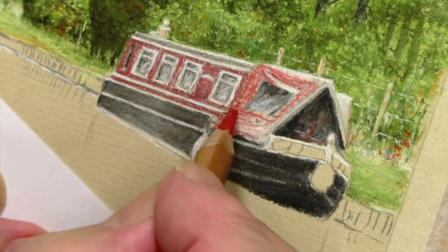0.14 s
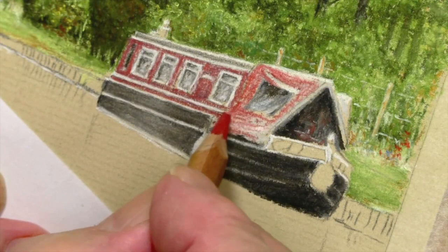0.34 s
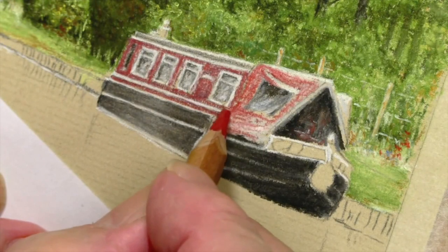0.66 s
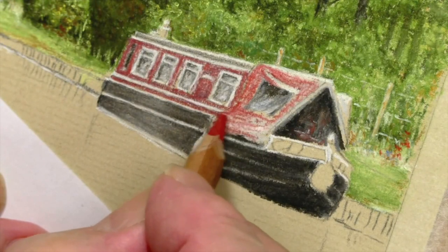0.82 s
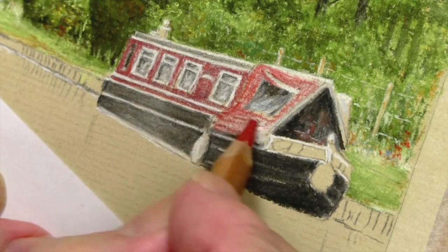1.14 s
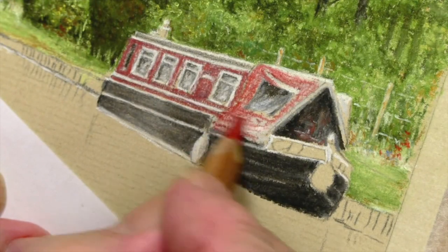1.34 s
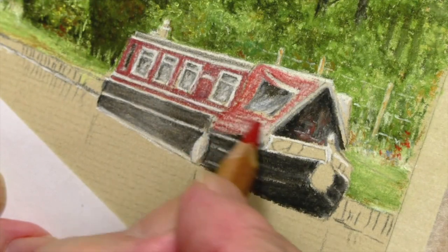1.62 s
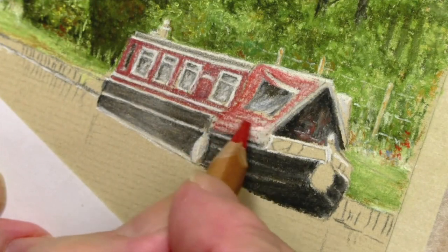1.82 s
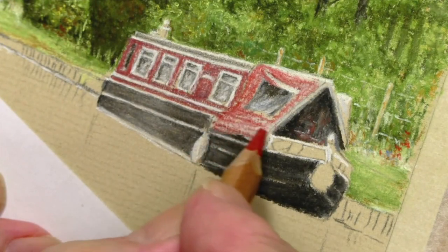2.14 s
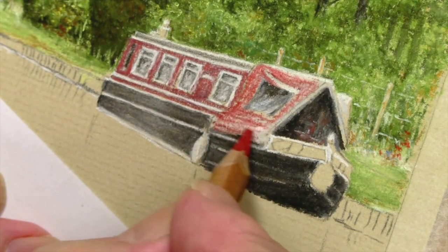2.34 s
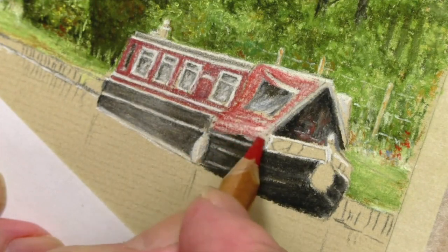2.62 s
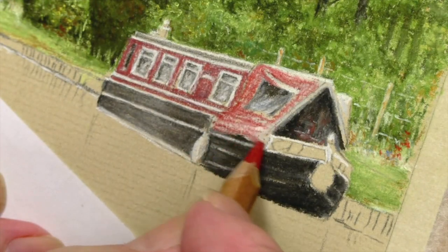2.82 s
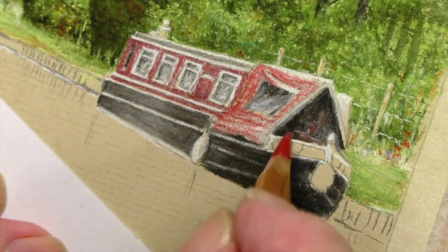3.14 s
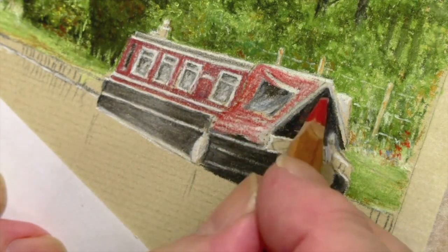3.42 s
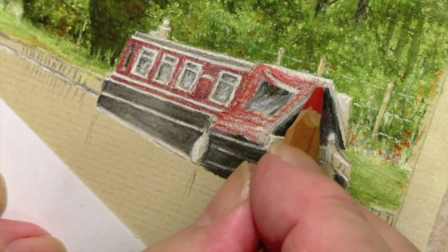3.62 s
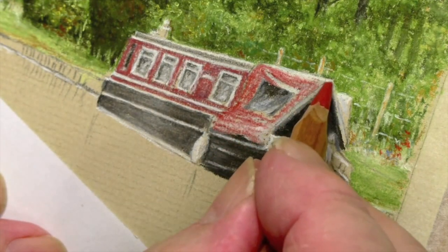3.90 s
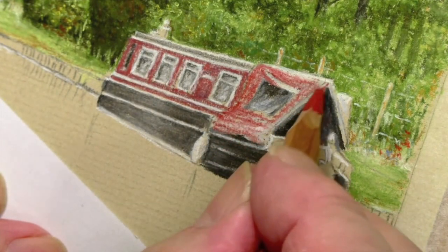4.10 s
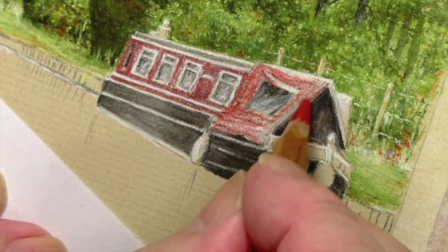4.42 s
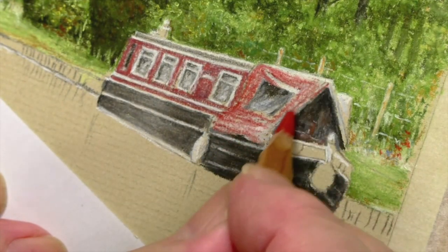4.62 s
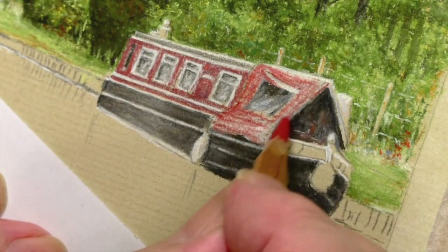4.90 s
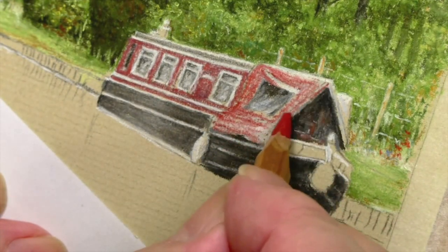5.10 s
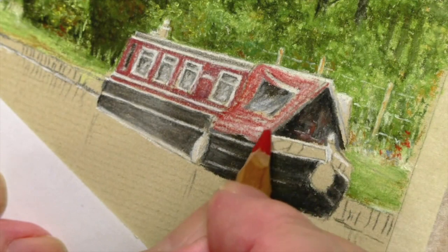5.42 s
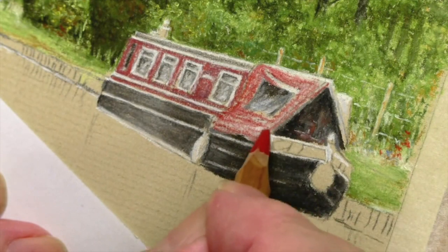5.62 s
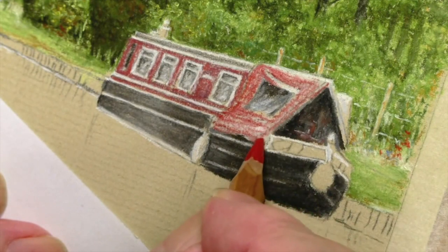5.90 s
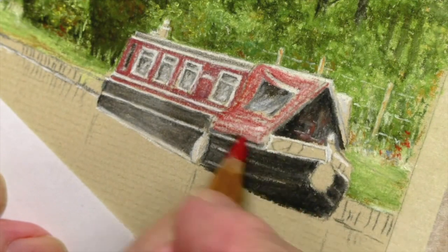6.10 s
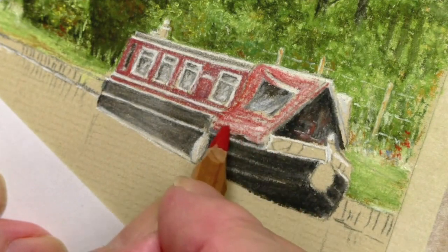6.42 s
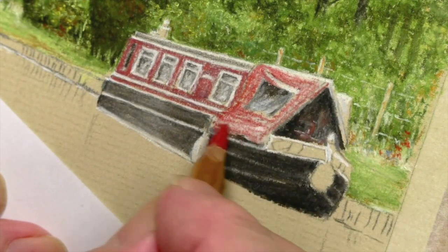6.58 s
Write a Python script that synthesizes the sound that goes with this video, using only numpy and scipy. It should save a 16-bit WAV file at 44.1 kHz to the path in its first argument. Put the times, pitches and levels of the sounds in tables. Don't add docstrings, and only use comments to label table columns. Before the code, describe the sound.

A coloured pencil scratches quick, dry shading strokes over toothed paper on a board, close up, above a faint low hum in a quiet room.

```python
import sys
import numpy as np
from scipy import signal
from scipy.fft import rfft, irfft, next_fast_len
from scipy.io import wavfile
from scipy.ndimage import uniform_filter1d, map_coordinates

SR = 44100
rng = np.random.default_rng(int(sys.argv[2]) if len(sys.argv) > 2 else 0)


def store_pcm(level_fs):
    pcm = np.round(np.clip(level_fs, -1, 1) * 32767).astype(np.int16)
    wavfile.write(sys.argv[1], SR, np.atleast_2d(pcm).T)


def linear_from_db(decibels):
    return 10 ** (np.asarray(decibels, float) / 20)


N = 297763

# start in seconds, speeding up in seconds, slowing down in seconds, top speed in dB, pressure in dB.
PENCIL_STROKES = [(0.027, 0.06, 0.072, -42, -44.5), (0.333, .026, 0.077, -49, -43.5),
                  (0.497, .026, .01, -69, -50), (0.552, 0.032, .14, -52.5, -46),
                  (0.702, .039, .055, -61, -50.5), (0.808, 0.035, 0.045, -50, -46),
                  (0.867, 0.056, 0.022, -57, -46), (0.966, 0.095, 0.034, -51, -45.5),
                  (1.123, 0.051, 0.077, -43, -44), (1.385, 0.067, 0.072, -41, -42.5),
                  (1.654, 0.057, 0.086, -43.5, -45), (1.86, .14, 0.061, -47, -48),
                  (2.049, .008, 0.029, -54, -50.5), (2.161, .031, 0.094, -48, -45.5),
                  (2.372, 0.065, 0.082, -47, -47), (2.631, 0.04, 0.086, -50, -48.5),
                  (2.822, .087, 0.053, -49, -45), (2.98, .12, .2, -51, -56), (3.13, .16, 0.054, -51, -56.5),
                  (3.28, 0.063, 0.3, -58, -66),
                  (3.822, 0.011, .04, -58, -56), (3.83, .1, 0.14, -62.5, -59),
                (3.986, 0.068, .066, -44.5, -47.5), (4.34, 0.053, 0.087, -42, -47),
                (4.571, 0.13, .07, -45, -44.5), (4.865, 0.14, 0.061, -46.5, -43),
                (5.159, 0.0078, .046, -60.5, -52), (5.185, 0.064, 0.12, -47, -45.5),
                (5.422, 0.039, 0.11, -49.5, -43), (5.46, .096, 0.063, -50, -48),
                (5.683, .012, 0.12, -57.5, -49.5), (5.701, 0.11, 0.06, -53, -47),
                (5.915, 0.015, .05, -56, -48), (6.008, 0.17, .124, -53.5, -60),
                (6.28, .019, .062, -56, -51), (6.451, .089, .01, -65, -51.5),
                (6.526, 0.046, 0.061, -50.5, -49), (6.638, 0.076, .023, -67.5, -59)]
# frequency in Hz, level in dB per Hz.
TIP_HISS = [(2000, -35), (3300, -13), (4200, -13), (5500, -10), (6750, -1), (7900, -3.5), (9500, 0.5),
            (11500, 2.5), (12500, 0), (15400, -2), (15750, -70)]
# frequency in Hz, level in dB per Hz.
PAPER_BODY = [(150, 11), (280, -4.5), (400, -2), (900, 1.5), (2000, -4), (2800, -4), (3300, -18.5),
              (4500, -47), (7000, -60)]
# frequency in Hz, width in Hz, level in dB.
BOARD_MODES = [(399, 58, -1.5), (550, 43, -5), (650, 53, -3.5), (824, 45.5, 3), (1070, 24, 1),
               (1202, 54, -1), (1610, 85, 4), (2096, 190, -0.5), (2580, 340, -10.5)]
# time in seconds, peak in dB.
TIP_KNOCKS = [(0.341, -44), (0.562, -40), (0.816, -44), (0.982, -46), (1.137, -41.5), (2.39, -39),
              (3.827, -38.5), (4.354, -41), (4.8853, -35), (5.163, -40.5), (5.4199, -29), (5.685, -31.5),
              (5.923, -40), (6.29, -49)]
# start in seconds, length in seconds, level in dB.
HAND_SLIDES = [
    (2.953, 0.42, -57.5),
    (3.333, 0.16, -65.5),
    (3.817, 0.044, -56),
    (6.447, 0.43, -62),
]
# time in seconds, peak in dB, centre in Hz, left-right balance in dB,
# 60 dB decay in seconds, crack in dB.
FINGER_TICKS = [
    (3.6451, -15, 8000, 11, 0.004, -6),
    (3.8264, -30.5, 6670, 7, 0.0044, -2),
    (3.902, -32.5, 7470, 6, 0.0094, -10),
    (3.9546, -25.5, 7500, 2, 0.0077, -17),
]
# frequency in Hz, likeness from 0 to 1.
PENCIL_ALIKE = [(300, 0.99), (1400, 0.94), (2600, 0.9), (3500, 0.18), (5500, 0.11), (8500, 0.31),
                (15000, 0.18)]
# frequency in Hz, balance in dB.
PENCIL_PAN = [(300, 0.5), (600, 1), (900, 4.5), (1200, 0), (1800, -1.7), (2400, 4), (2800, 0), (8000, 0.4),
              (14000, 0.5)]
# frequency in Hz, phase in radians.
PENCIL_LEAD = [(300, 0), (5000, -0.66), (6200, 0.6), (9500, 1.4), (10700, 2.5), (12300, 5.5), (14500, 4)]
# frequency in Hz, level in dB per Hz.
DRAUGHT_SPECTRUM = [(1, -10), (4, 20), (8, 14), (12.5, 13.5), (17, 16), (30, -52)]
# time in seconds, strength in dB.
GUSTS = [(0.0, -29), (0.04, -42), (0.69, -35.5), (0.73, -51.5), (1.41, -29.5), (1.88, -44.5), (2.05, -34.5),
         (4.72, -41.5), (4.83, -30), (4.89, -38.5), (6.26, -30.5), (6.3, -43), (6.67, -27), (6.75, -49)]
# frequency in Hz, level in dB per Hz.
RUMBLE_SPECTRUM = [(14, -13.5), (20, 5), (33, -1), (42, -2), (60, -5.5), (100, -11.5), (130, -15),
                   (185, -23.5), (210, -23.5), (320, -31), (500, -59)]
# frequency in Hz, rms level in dB, unsteadiness in dB.
HUM_LINES = [(49.5, -52, 4), (76, -56, 4), (99.3, -54.5, 3.5), (147.5, -57, 3.5), (222, -69, 3),
             (1500, -75, 1), (1701, -74, 1)]
# time in seconds, rms level in dB.
MACHINE_LOAD = [(0.0, -75), (0.51, -49.5), (0.6, -67), (0.71, -54), (0.88, -74.5), (1.49, -51.5),
                (3.74, -63), (3.91, -49), (4.28, -77), (4.36, -53), (5.88, -77), (6.13, -53), (6.2, -79),
                (6.24, -62), (6.71, -66), (6.75, -67)]
# frequency in Hz, level in dB per Hz.
HISS_SPECTRUM = [(150, -66), (250, -8), (400, 3), (600, -4.5), (1500, -4.5), (2300, -10.5), (3200, -18.5),
                 (4300, -15), (5500, -15), (7200, -10), (9500, -13.5), (12500, -16.5), (15300, -19),
                 (15700, -64)]
# frequency in Hz, likeness from 0 to 1.
ROOM_ALIKE = [(60, 0.99), (150, 0.9), (300, 0.67), (700, 0.3), (1500, 0.34), (3000, 0), (6000, 0.02)]
# frequency in Hz, width in Hz, depth from 0 to 1.
HOUSING_NOTCHES = [(4590, 780, 0.55), (10687, 1250, 0.95)]

TIP_POWER, SHEET_POWER, BOARD_POWER = 2.06, 2.02, 0.84
SHEET_SPEED, SHEET_PRESSURE = 0.62, 0.46
SHEET_HZ, SHEEN_HZ, TOP_HZ = 1000, 10700, 15650
LANDS, BITE_S = 0.25, 0.0054
LINGER_S, LINGER_DB = 0.02, -13
THUD_HZ, THUD_WIDE_HZ = 560, 420
SLIDE_HZ, SLIDE_WIDE_HZ = 384, 160
RUMBLE_DB, RUMBLE_FOLLOWS, RUMBLE_SWAY_DB = -40.5, 0.16, 2
MACHINE_HZ = 175.5


def strokes():
    def sheet_db(speed_db, pressure_db):
        return SHEET_SPEED * (speed_db + 46.5) + SHEET_PRESSURE * (pressure_db + 47) - 45

    fast = hand(TIP_POWER, lambda speed_db, pressure_db: speed_db)
    sheet = hand(SHEET_POWER, sheet_db)
    pressed = hand(BOARD_POWER, lambda speed_db, pressure_db: pressure_db + 2.0)

    grain = wobble(45) + wobble(220)
    tip_catches = fibres(grain, spread_db=2.5, tooth_db=0.67, patchy_db=3.0)
    hiss = stereo(tip_catches, lambda hz: linear_from_db(along(TIP_HISS, hz)), PENCIL_ALIKE)
    hiss, sheen = split(hiss, SHEEN_HZ)
    brightness = (fast * linear_from_db(34)) ** 0.63
    tip = linear_from_db(3.5) * fast * (hiss + brightness * sheen)

    body_catches = fibres(grain, spread_db=4.5, tooth_db=1.0, patchy_db=2.5)
    body = lambda hz: linear_from_db(along(PAPER_BODY, hz)) * (linear_from_db(-8.5) + np.abs(board(hz)))
    low, high = split(stereo(body_catches, body, PENCIL_ALIKE), SHEET_HZ)
    return tip + pressed * low + sheet * high


def hand(power, level):
    energy = np.zeros(N + SR)
    for start, rise, fall, speed_db, pressure_db in PENCIL_STROKES:
        t = np.arange(round((rise + fall) * SR)) / SR
        nearer_end = np.minimum(t / rise, (rise + fall - t) / fall)
        speed = np.sin(np.pi / 2 * np.clip(nearer_end, 0, 1))
        touch = np.clip((t - LANDS * rise) / BITE_S, 0, 1)
        gain = linear_from_db(level(speed_db, pressure_db)) * touch * speed ** power
        energy[round(start * SR):][:len(t)] += gain ** 2
    energy = energy[:N]
    keep = np.exp(-1 / (LINGER_S * SR))
    lingering = signal.lfilter([1 - keep], [1, -keep], energy)
    return np.sqrt(energy + linear_from_db(2 * LINGER_DB) * lingering)


def fibres(grain, spread_db, tooth_db, patchy_db):
    sizes = linear_from_db(spread_db * rng.standard_normal((2, N)))
    tooth = linear_from_db(tooth_db * grain)
    catches = rng.standard_normal((2, N)) * sizes * tooth
    z = signal.stft(catches, nperseg=512)[2]
    field = uniform_filter1d(rng.standard_normal(z.shape[1:]), size=2, axis=0)
    field = uniform_filter1d(field, size=24, axis=1)
    patchy = signal.istft(z * linear_from_db(patchy_db * unit(field)), nperseg=512)[1]
    return unit(patchy[:, :N])


def board(hz):
    return sum((-1) ** k * linear_from_db(db) * resonance(hz, centre, width)
               for k, (centre, width, db) in enumerate(BOARD_MODES))


def knocks():
    blows, t = np.zeros(N), np.arange(SR // 20) / SR
    for start, db in TIP_KNOCKS:
        scuff = linear_from_db(-35 - 60 * t / 0.03) * rng.standard_normal(len(t))
        blow = t / 0.00016 * np.exp(-t / 0.00023)
        blows[round(start * SR):][:len(t)] += linear_from_db(db + 11.0) * (blow + scuff)

    def struck(hz):
        thud = linear_from_db(1.5) * resonance(hz, THUD_HZ, THUD_WIDE_HZ)
        ring = linear_from_db(-7) * board(hz / 1.02)
        return (thud + ring) / (1 + (hz / 2800) ** 4)

    return filtered(blows, struck)


def slides():
    t = np.arange(N) / SR
    gain = sum(linear_from_db(db) * np.sin(np.pi * np.clip((t - start) / length, 0, 1)) ** 0.55
               for start, length, db in HAND_SLIDES)
    dull = lambda hz: resonance(hz, SLIDE_HZ, SLIDE_WIDE_HZ) ** 2
    lumps = linear_from_db(3.7 * wobble(30))
    return gain * lumps * unit(filtered(rng.standard_normal(N), dull))


def ticks():
    out, t = np.zeros((2, N + SR)), np.arange(SR // 8) / SR
    late = lambda x, seconds: np.pad(x, (round(seconds * SR), 0))[:len(t)]
    tone = lambda hz: np.sin(2 * np.pi * hz * t)
    bright = np.vstack([signal.butter(3, 6000, "high", fs=SR, output="sos"),
                        signal.butter(10, 15500, fs=SR, output="sos")])
    for start, db, hz, pan_db, t60, crack_db in FINGER_TICKS:
        upper = linear_from_db(8) * tone(1.23 * hz) + linear_from_db(7.5) * tone(1.44 * hz)
        crack = linear_from_db(crack_db) * (rng.standard_normal(len(t)) + upper)
        tick = (crack + tone(hz)) * linear_from_db(-60 * t / t60) * (1 - np.exp(-t / 0.0002))
        tick = tick + linear_from_db(-11) * late(tick, 0.0024) + linear_from_db(-17) * late(tick, 0.005)
        tail = uniform_filter1d(rng.standard_normal((2, len(t))), size=3)
        tail = tail * linear_from_db(-29 - 60 * t / 0.4) * (t > 0.015)
        ports = np.array([tick, late(tick, 2 / SR)]) * linear_from_db([[pan_db / 2], [-pan_db / 2]])
        out[:, round(start * SR):][:, :len(t)] += linear_from_db(db) * signal.sosfilt(bright, ports + tail)
    return out[:, :N]


def floor():
    t = np.arange(N) / SR

    def noise(spectrum):
        return stereo(rng.standard_normal((2, N)), lambda hz: linear_from_db(along(spectrum, hz)), ROOM_ALIKE)

    def line(hz):
        return np.sqrt(2) * np.sin(2 * np.pi * hz * t + 1.2 * wobble(4))

    draught_db, machine_db = curve(GUSTS), curve(MACHINE_LOAD)
    rumble_db = RUMBLE_DB + RUMBLE_FOLLOWS * (draught_db + 35) + RUMBLE_SWAY_DB * wobble(4)
    hum = sum(linear_from_db(db - 3.0 + sway_db * wobble(3.05)) * line(hz) for hz, db, sway_db in HUM_LINES)
    draught = linear_from_db(draught_db) * noise(DRAUGHT_SPECTRUM)
    rumble = linear_from_db(rumble_db) * noise(RUMBLE_SPECTRUM)
    machine = linear_from_db(machine_db - 1.0) * line(MACHINE_HZ)
    air = linear_from_db(-58.0 + 0.25 * wobble(3.34)) * noise(HISS_SPECTRUM)
    return draught + rumble + hum + machine + air


def unit(x):
    return x / np.sqrt(np.mean(x ** 2) + 1e-20)


def along(points, hz):
    f, v = np.transpose(points)
    return np.interp(np.log(hz + 1), np.log(f + 1), v)


def curve(rows):
    seconds, values = np.transpose(rows)
    return np.interp(np.arange(N) / SR, seconds, values)


def wobble(rate):
    coarse = np.arange(0, N + 32, 32)
    knots = rng.standard_normal(int(N / SR * 400))
    return np.interp(np.arange(N), coarse, map_coordinates(knots, [coarse * rate / SR]))


def resonance(hz, centre, width):
    return 1j * hz * width / (centre ** 2 - hz * hz + 1j * hz * width)


def filtered(x, response):
    m = next_fast_len(N + SR // 8, real=True)
    return irfft(rfft(x, m) * response(np.fft.rfftfreq(m, 1 / SR)), m)[..., :N]


def split(x, edge_hz):
    low = filtered(x, lambda hz: 1 / (1 + (hz / edge_hz) ** 6))
    return low, x - low


def stereo(pair, response, alike):
    def mid_side(hz):
        turn = np.arccos(np.clip(along(alike, hz), -1, 1)) / 2
        return response(hz) * (hz < TOP_HZ) * [np.cos(turn), np.sin(turn)]

    mid, side = filtered(pair, mid_side)
    return np.array([mid + side, mid - side]) / np.sqrt(np.mean(mid ** 2))


def scene():
    def ports(hz):
        halves = np.array([[0.5], [-0.5]])
        return linear_from_db(along(PENCIL_PAN, hz) * halves) * np.exp(1j * along(PENCIL_LEAD, hz) * halves)

    return filtered(strokes() + knocks() + slides(), ports) + ticks() + floor()


def band_limit(x):
    return signal.sosfilt(signal.butter(12, 16640, fs=SR, output="sos"), x)


def record(dry):
    def housing(hz):
        return np.prod([1 - np.clip(depth, 0, 1) / (1 + (2 * (hz - centre) / width) ** 2)
                        for centre, width, depth in HOUSING_NOTCHES], axis=0)

    return band_limit(filtered(dry, housing))


dry = scene()
out = record(dry)
store_pcm(out)
```